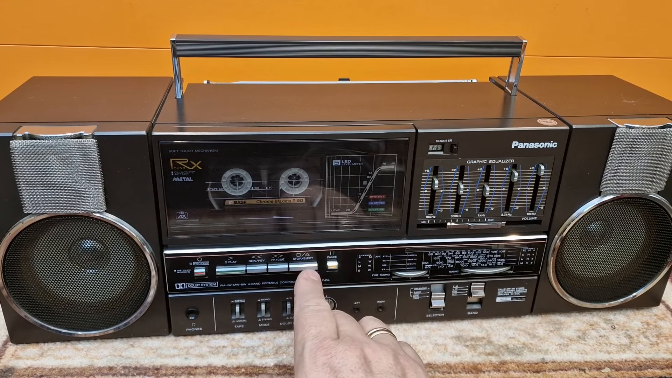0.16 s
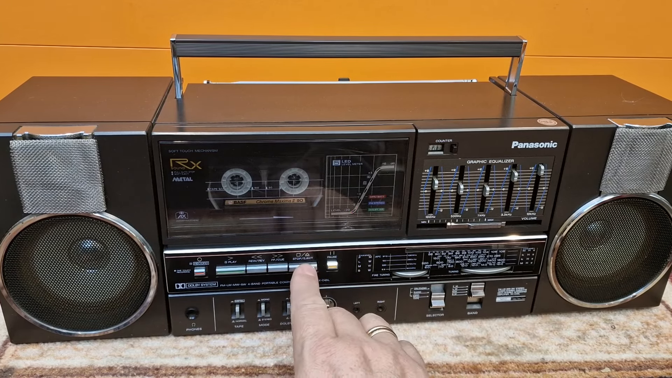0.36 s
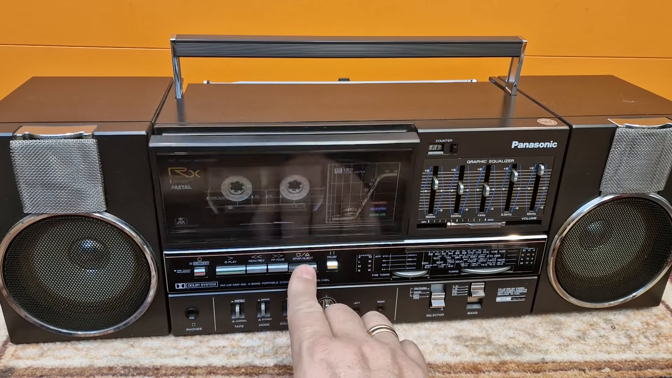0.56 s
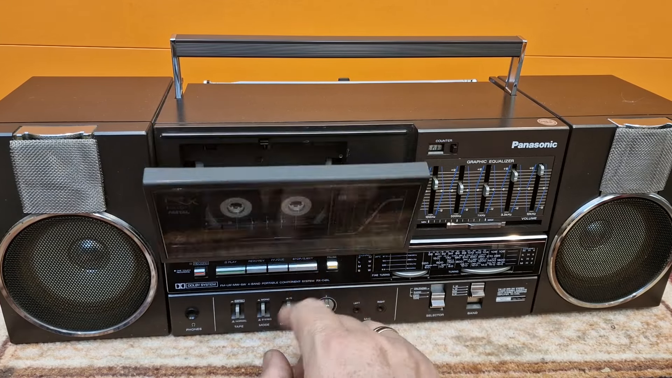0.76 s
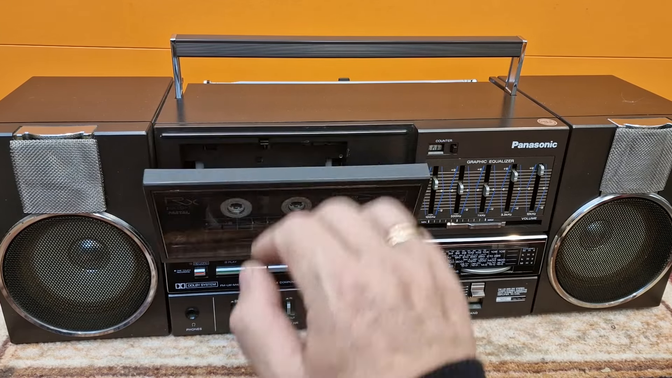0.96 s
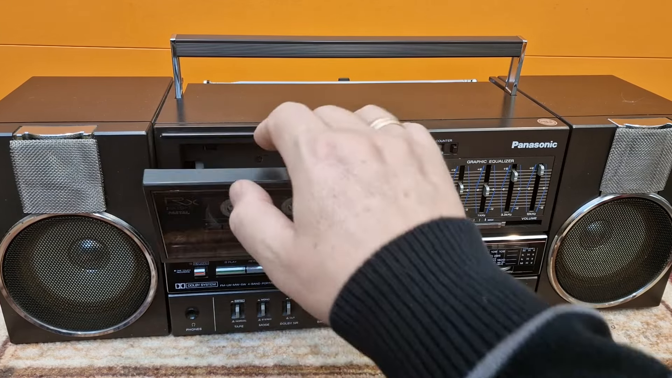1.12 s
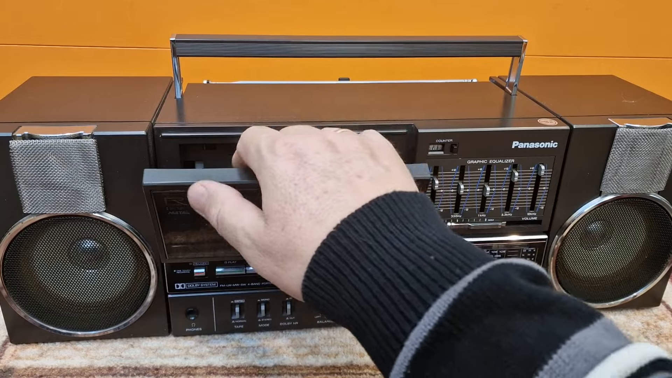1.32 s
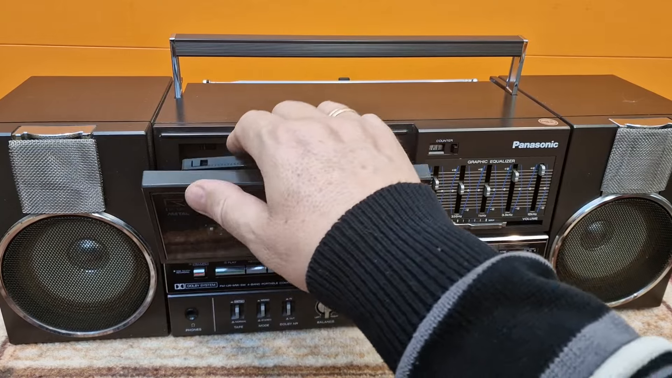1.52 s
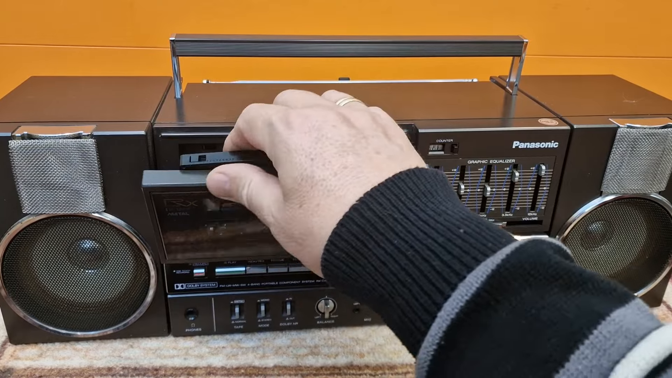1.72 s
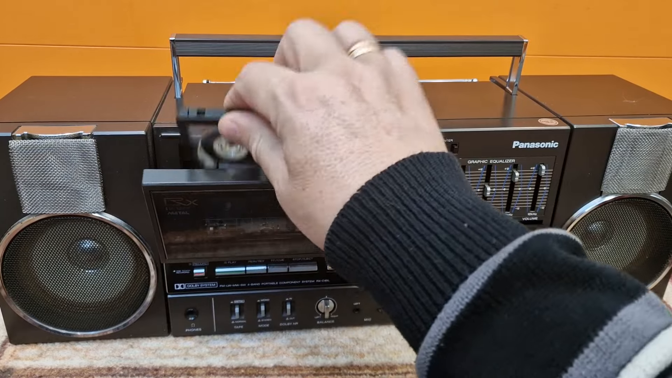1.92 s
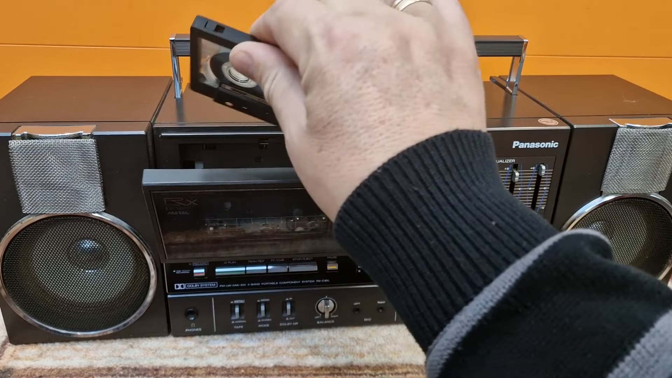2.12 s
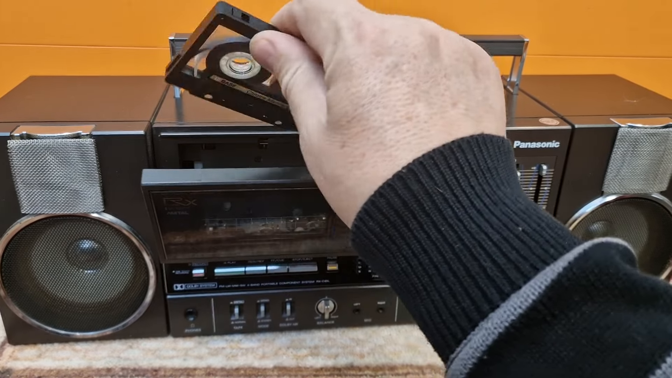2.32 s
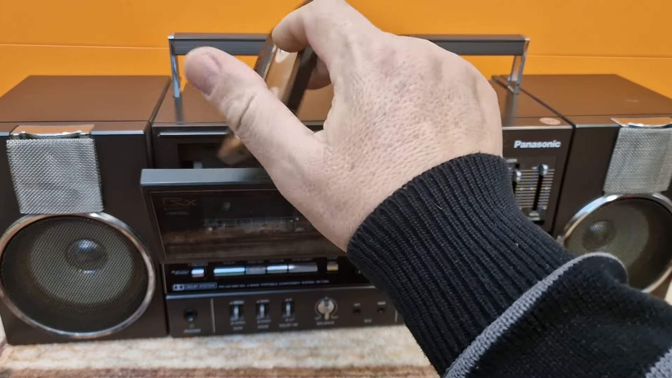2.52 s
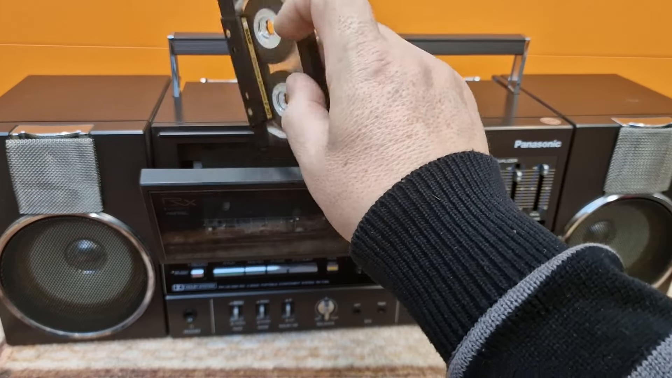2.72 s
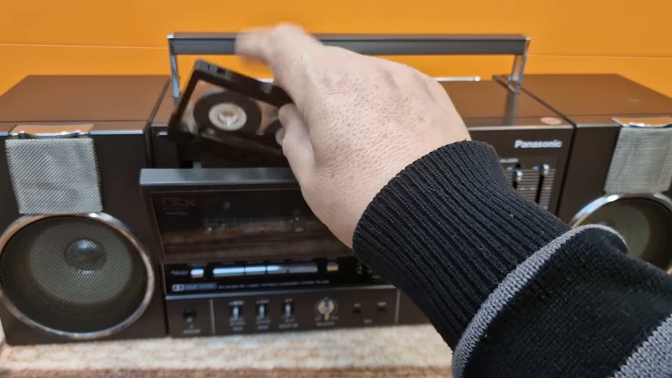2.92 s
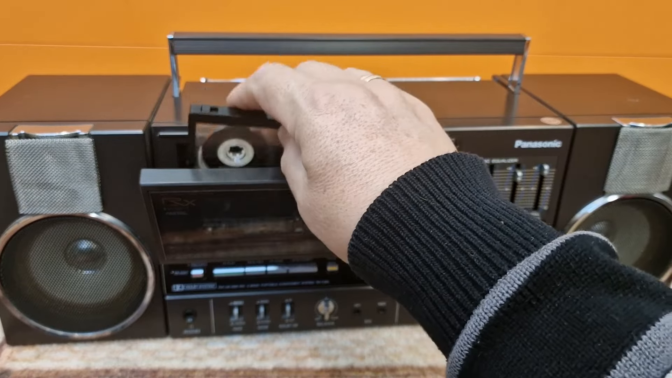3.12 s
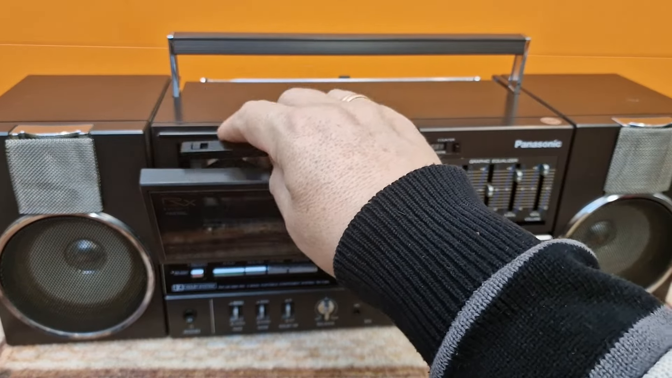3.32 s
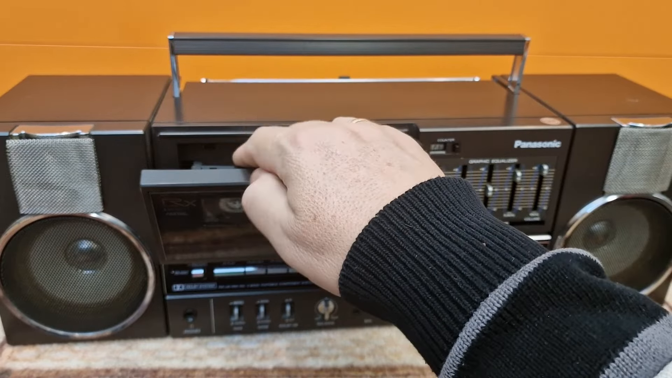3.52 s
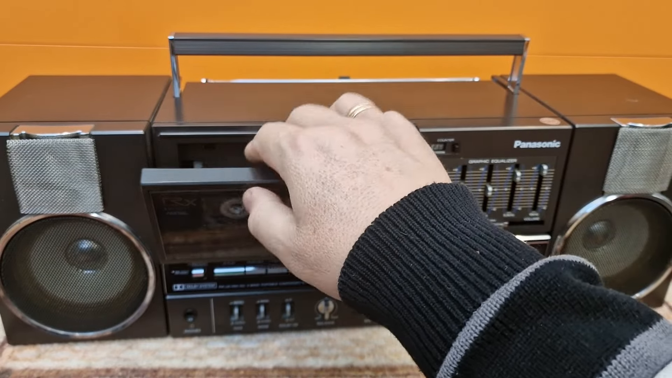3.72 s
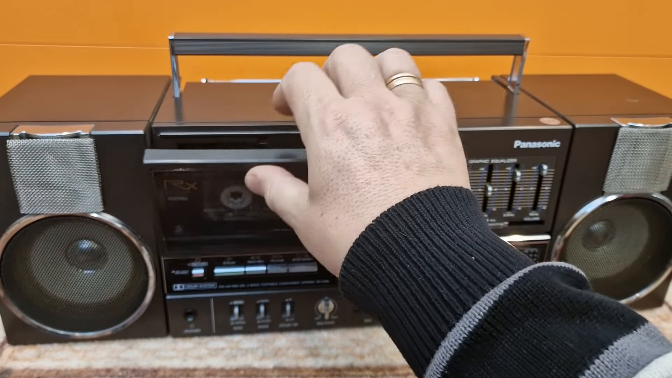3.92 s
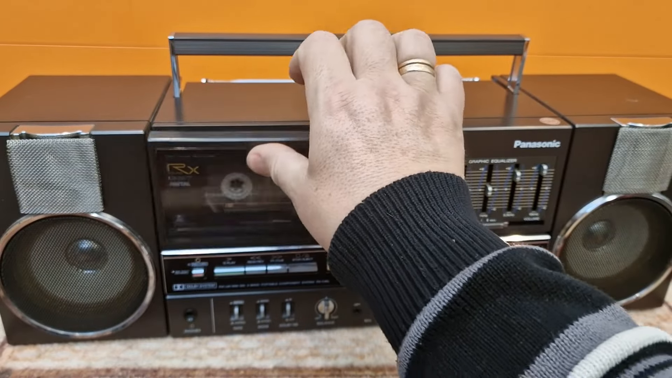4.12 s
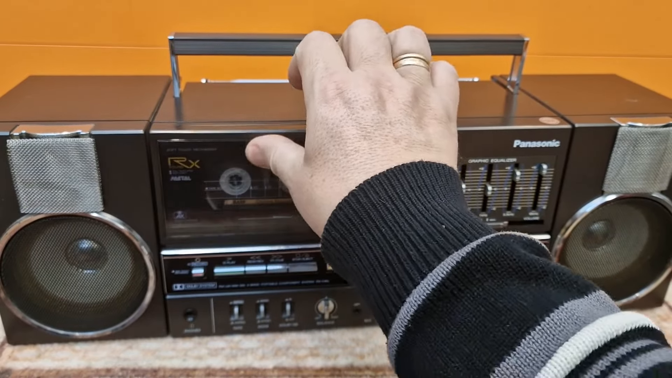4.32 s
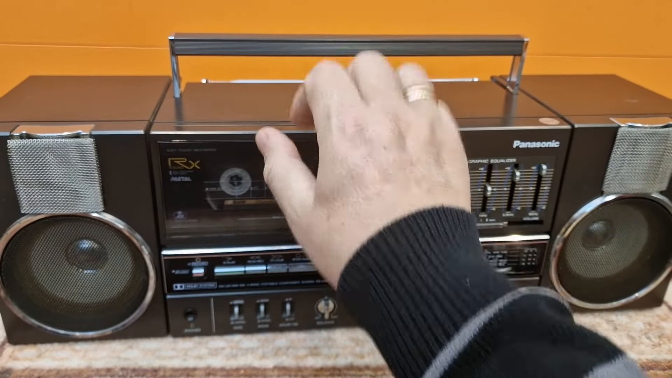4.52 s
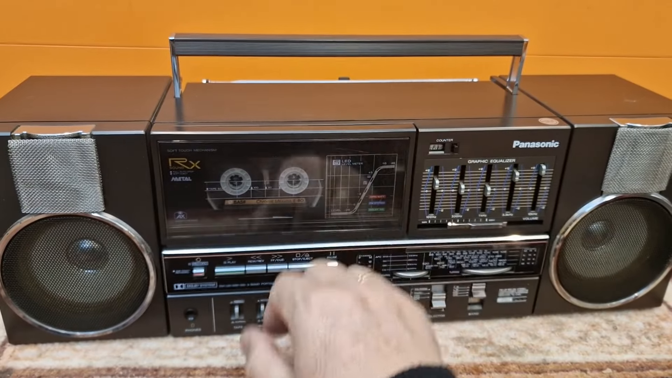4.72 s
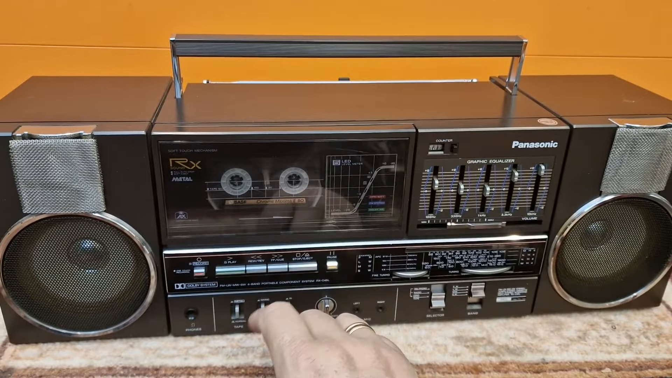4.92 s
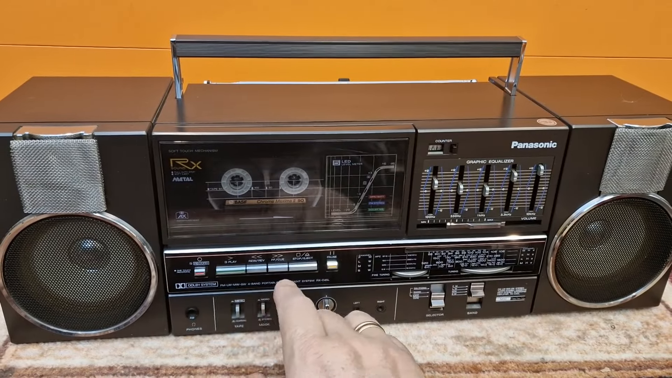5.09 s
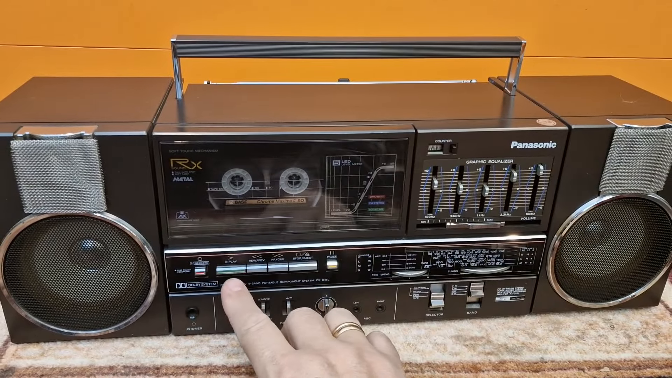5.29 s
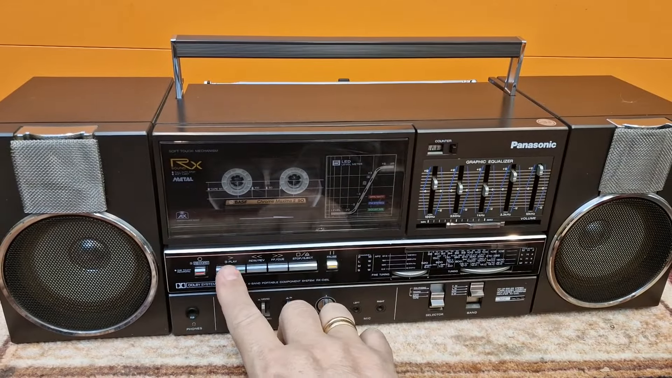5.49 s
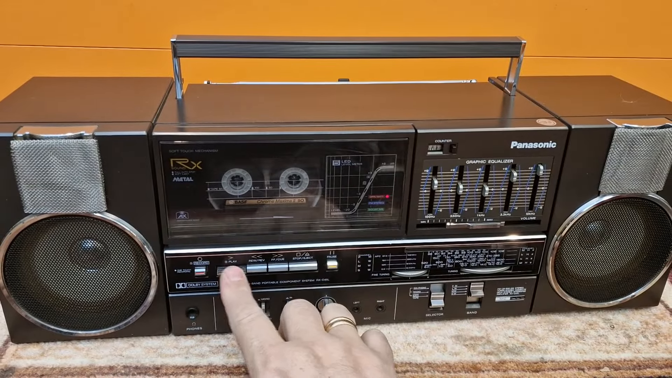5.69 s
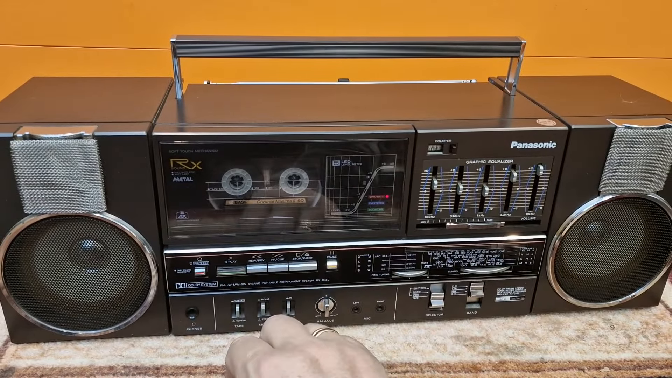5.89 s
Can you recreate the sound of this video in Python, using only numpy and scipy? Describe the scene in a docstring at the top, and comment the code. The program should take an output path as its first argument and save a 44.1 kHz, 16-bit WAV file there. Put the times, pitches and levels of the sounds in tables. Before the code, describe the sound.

Close stereo sound of a cassette deck handled indoors, slightly left, with a short small-room tail, low rumble and faint hiss. A quiet gear-like whirr runs at first. At about 0.57 s a key gives a hard double clack with a hollow cabinet knock; the door opens with softer knocks until 0.85 s, and the whirr fades out after 1 s. From 1.4 to 2.25 s the cassette clicks, scrapes and rattles out, loudest near 2.1 s. Sparse, light bright ticks follow at 2.5-2.9 s as it is turned. A brief squeak at 3.05 s leads into knocks and sliding, with strong clunks at 3.16, 3.45 and 3.6 s as it seats. The door shuts in a sharp double snap near 4.3 s, with a small click at 4.45 s. A deep, dull thump comes at 4.86 s amid faint hum. A modest key click lands at 5.67 s, trailed by small ticks.

```python
"""A portable tape deck on a carpet, worked by hand close by: stop key, door, cassette out, turned and back in,
door shut, play key. Noise bursts ring the cassette shell as hard plastic ticks, half-sine pushes ring the
hollow cabinet as knocks, friction noise makes the slides and a squeak, and one dull thump shakes the floor.
The tape drive whirrs at first as resonant noise; a hum surrounds the thump, over low rumble and faint hiss.
A small room answers the handling as decaying noise tails."""
import sys
import numpy as np
from scipy import signal
from scipy.fft import rfft, irfft, next_fast_len
from scipy.io import wavfile

SR = 44100
rng = np.random.default_rng(int(sys.argv[2]) if len(sys.argv) > 2 else 0)


def bounce(signal):
    """Save signal as a 16-bit WAV file at the path given by the first command-line argument."""
    frames = np.transpose(np.atleast_2d(signal))
    limited = np.clip(frames, -1, 1)
    pcm = np.round(limited * 32767).astype(np.int16)
    wavfile.write(sys.argv[1], SR, pcm)


N = 262395

# resonances of the cassette shell: centre_hz, width_hz, relative_db
SHELL = [(860, 750, -8), (1100, 840, -3), (1272, 174, 4.5), (1513, 315, 3), (1745, 248, 6), (2290, 750, -2),
         (2530, 284, -2)]
# treble resonances of hard plastic in contact: centre_hz, width_hz, relative_db
CRACK = [(3036, 740, 7), (3783, 1420, 4.5), (4960, 1160, 3), (5980, 680, 0), (7170, 1090, 1.5),
         (9460, 17000, -20), (11000, 4000, -17.5), (12820, 1900, -10.5), (14400, 1700, -11)]
# resonances of the cabinet panels: centre_hz, width_hz, relative_db
PANELS = [(296.8, 24.4, 0.5), (353.9, 12, 2.5), (415, 62, -6), (501, 46, -3), (630, 72, -6), (845, 20, -13)]
# resonances of the air in the cabinet: centre_hz, width_hz, relative_db
CABINET_AIR = [(120.3, 12, 0.5), (163.1, 11.3, 8.5)]
# drive of the cabinet's murmur under the working hand: time_s, panels_db, air_db
MURMUR_LEVELS = [(0.0, -67.5, -74.5), (0.4, -63.5, -72), (0.86, -58.5, -54), (1.14, -69, -74),
                 (1.62, -70.5, -62), (1.95, -61, -63), (2.3, -84, -83), (3.05, -77.5, -78.5),
                 (3.2, -64, -64.5), (3.66, -49.5, -52), (4.04, -80.5, -77), (4.39, -57, -59),
                 (4.59, -79.5, -69), (4.94, -78, -62.5), (5.39, -82, -75), (5.72, -60.5, -58),
                 (5.95, -68.5, -56)]


def amp(db):
    """A level in decibels is a logarithmic ratio: returns the linear amplitude gain."""
    return 10 ** (np.asarray(db) / 20)


def pan(left_over_right_db):
    """Intensity stereo: the level difference is shared equally between the two ports."""
    return amp(left_over_right_db * np.array([[0.5], [-0.5]]))


def unit(x):
    """Power normalization: scales a signal to rms 1."""
    return x / np.sqrt(np.mean(x ** 2) + 1e-20)


def along(points, hz):
    """Logarithmic frequency scale: interpolates (frequency, value) points along it."""
    point_hz, value = np.transpose(points)
    return np.interp(np.log(hz + 1), np.log(point_hz + 1), value)


def curves(rows, outside=None):
    """Piecewise-linear envelopes: one value per sample for each column after the time."""
    time_s, *columns = np.transpose(rows)
    return [np.interp(np.arange(N) / SR, time_s, column, outside, outside) for column in columns]


def held(start_s, stop_s, level_db, edge_s, fade_db):
    """Sustained-tone envelope: an onset, a drift by -fade_db while held, and a release."""
    points = [(start_s, level_db - 19), (start_s + edge_s, level_db),
              (stop_s - edge_s, level_db - fade_db), (stop_s, level_db - 25.5)]
    return amp(curves(points, outside=-120)[0])


def filtered(x, gain):
    """Convolution theorem: multiplies the spectrum by a gain that depends on frequency."""
    size = next_fast_len(N + SR // 2)
    hz = np.fft.rfftfreq(size, 1 / SR)
    return irfft(rfft(x, size) * gain(hz), size)[..., :N]


def response(modes, f):
    """Modal superposition: second-order resonances of alternating sign; white noise keeps its rms."""
    ring = 0
    for k, (centre, width, db) in enumerate(modes):
        resonance = 1j * f * width / (centre * centre - f * f + 1j * f * width)
        ring = ring + (-1) ** k * amp(db) * resonance
    return ring / np.sqrt(np.mean(abs(ring) ** 2))


def body(x, modes):
    """Forced vibration: the excitation x rings a set of resonances."""
    return filtered(x, lambda f: response(modes, f))


def pair(size, alike):
    """Interchannel coherence: two noises whose correlation is alike."""
    common, opposite = rng.standard_normal((2, size))
    turn = np.arccos(np.clip(alike, 0, 1)) / 2
    return np.cos(turn) * common + np.sin(turn) * opposite * [[1], [-1]]


def gritty(spread_db, count):
    """Stick and slip of a rubbing contact: a random gain of rms 1 that holds for count samples."""
    step_db = spread_db * rng.standard_normal(N // count + 1)
    return unit(np.repeat(amp(step_db), count)[:N])


def tilt(s, f):
    """Spectral tilt about 6 kHz: the treble gain at time s, flat below 2.5 kHz."""
    # dull with the cassette in its well, bright out in the open and on the keys: time_s, tilt_db_per_octave
    openness = [(0.62, 1.5), (0.75, -4), (1.3, -4.5), (2.04, -2.5), (2.08, 3), (2.9, 4), (3.12, -1.5),
                (3.65, -0.5), (3.8, -15.5), (4.28, 0.5), (4.45, -8), (5.6, -6), (5.67, 2.5), (5.9, -5)]
    octaves = np.log2(np.clip(f, 2500, None) / 6000)
    return amp(np.interp(s, *np.transpose(openness)) * octaves)


def drive():
    """Resonant radiation: broad noise of gears and tape with narrow housing resonances, running down."""
    # resonances of the drive housing: centre_hz, width_hz, relative_db
    housing = [(410, 50, 5), (1610, 56, -4), (2288, 92, -0.5), (3650, 150, -8.5), (5360, 180, -12),
               (6600, 170, -11.5), (8070, 75, -5.5), (8470, 160, -35), (11200, 150, -16.5)]
    # spectral density of the broad noise: frequency_hz, relative_db_per_hz
    bed_spectrum = [(88, -10), (150, -15.5), (439, -11.5), (1870, -18), (2310, -15), (2870, -20),
                    (8070, -20), (16000, -32)]
    start_db, sag_db_per_s = -56.5, 7.5
    stop_s, run_down_db_per_s = 1, 35.5  # added to the sag after stop_s
    bed = unit(filtered(pair(N, 0.059), lambda hz: amp(along(bed_spectrum, hz))))
    whirr = bed + amp(1.0) * body(pair(N, 0.25), housing)
    t = np.arange(N) / SR
    level_db = start_db - sag_db_per_s * t - run_down_db_per_s * np.maximum(t - stop_s, 0)
    return amp(level_db) * whirr * pan(7)


def hiss():
    """Partly coherent noise field: room tone and microphone noise, most alike left and right in the bass."""
    # spectral density: frequency_hz, relative_db_per_hz
    spectrum = [(15, -33), (25, -8.5), (149, -6), (249, -16.5), (624, -27), (714, -26.5), (818, -19.5),
                (911, -27), (1230, -21), (1790, -23), (2480, -24.5), (5880, -30.5), (7510, -26.5),
                (9570, -45.5), (16000, -55.5)]
    # left-right correlation: frequency_hz, correlation
    likeness = [(60, 0.7), (240, 0.26), (950, 0.05), (3770, 0.073), (15000, 0.13)]

    def mid_side_gain(hz):
        turn = np.arccos(np.clip(along(likeness, hz), -1, 1)) / 2
        return amp(along(spectrum, hz)) * [np.cos(turn), np.sin(turn)]

    mid, side = filtered(rng.standard_normal((2, N)), mid_side_gain)
    return amp(-73) * unit(np.array([mid + side, mid - side]))


def murmur():
    """Forced vibration: the working hand feeds gritty noise to the panels and the air of the cabinet."""
    panels_db, air_db = curves(MURMUR_LEVELS)
    noise = gritty(spread_db=3.5, count=300) * rng.standard_normal((2, N))
    panels = body(amp(panels_db) * noise[0], PANELS)
    air = body(amp(air_db) * noise[1], CABINET_AIR)
    return (panels + air) * pan(1.6)


def rumble():
    """Narrow-band noise: one low resonance, with a steady part and a part that follows the murmur."""
    steady_db, below_murmur_db = -81, -18.5
    level = amp(steady_db) + amp(curves(MURMUR_LEVELS)[0] + below_murmur_db)
    return level * body(pair(N, 1.0), [(55, 17, 0)])


def slide():
    """Friction excitation: grit rings the shell and treble modes, and swells with the stroke's speed."""
    # plastic on plastic: start_s, fastest_s, stop_s, fastest_db, fizz_db (before the tilt, over the shell)
    strokes = [(0.537, 0.62, 0.97, -60, -3), (1.38, 1.57, 1.65, -56, -3), (1.787, 2.106, 2.34, -50.5, -5),
               (2.386, 2.495, 2.6, -69, 6), (2.62, 2.86, 2.99, -72.5, 6),
               (3.355, 3.622, 3.92, -50.5, -14.5), (4.135, 4.368, 4.51, -59.5, -5.5),
               (5.548, 5.75, 6.1, -61, -4)]
    start_below_db, stop_below_db = -20, -22  # relative to the fastest moment
    rub, fizz = np.zeros(N), np.zeros((2, N))
    grit = gritty(spread_db=1, count=120) * pan(3)
    for start, fastest, stop, db, fizz_db in strokes:
        swell = [(start, db + start_below_db), (fastest, db), (stop, db + stop_below_db)]
        level = amp(curves(swell, outside=-120)[0])
        rub += level
        treble = filtered(grit * pair(N, 0.86), lambda f: response(CRACK, f) * tilt(fastest, f))
        fizz += amp(fizz_db) * level * treble
    return body(rub * grit * pair(N, 0.71), SHELL) + fizz


def ticks():
    """Impact excitation: each contact scuffs in and rattles briefly, ringing shell and treble modes."""
    # hard plastic contacts: time_s, shell_db, crack_db (relative to the shell), rattle_s
    contacts = [(0.568, -25.5, -7.5, 0.0078), (0.5773, -23, -2, 0.0037), (0.615, -33.5, -5, 0.0049),
                (0.7485, -42, 2, 0.011), (0.853, -46, -6, 0.0048), (1.182, -62, 2.5, 0.014),
                (1.4006, -30, -3.5, 0.0024), (1.4565, -32, -12, .0068), (1.511, -31, -13.5, 0.0047),
                (1.573, -38, -9, 0.0067), (1.592, -37.5, -8.5, .0036), (1.7, -45, -33, 0.0033),
                (1.799, -57, -30, 0.0043), (1.849, -40.5, -4.5, 0.006), (1.905, -46.5, -11, 0.0038),
                (1.946, -42.5, -10, 0.008), (1.9625, -41.5, -3, 0.016), (1.99, -33.5, -4.5, 0.0069),
                (2.044, -37, -17.5, 0.0073), (2.068, -35, -6, 0.0052), (2.0825, -25.5, -7, 0.0041),
                (2.169, -25, -12.5, 0.0018), (2.1935, -28.5, -8.5, 0.0043), (2.2324, -41, 5, 0.001),
                (2.483, -56.5, 5, 0.0035), (2.5136, -54, 7, 0.0047), (2.6267, -35, -5, 0.0084),
                (2.661, -48, 2, 0.0071), (2.739, -61, 15.5, 0.0061), (2.8025, -54, 8, .0038),
                (2.8316, -48, 1, 0.0048), (2.8656, -57.5, 16.5, 0.0059), (2.906, -65, 18.5, 0.0056),
                (3.01, -42, -11.5, 0.012), (3.117, -39.5, -8, 0.0062), (3.1585, -25.5, -5.5, 0.0059),
                (3.1925, -32, -7, 0.0074), (3.276, -37.5, -2.5, 0.0041), (3.3933, -41.5, -14.5, 0.0015),
                (3.4488, -23.5, -7, 0.006), (3.5987, -40.5, -11, 0.0092), (3.6132, -28.5, -6, .0078),
                (3.6374, -24, -1.5, 0.003), (3.795, -46.5, -9, 0.0079), (4.144, -57, -24, 0.0068),
                (4.1987, -48, -4.5, 0.018), (4.215, -60, 10, .002), (4.2307, -44.5, 0.5, 0.003),
                (4.251, -41, -11, 0.0053), (4.282, -24.5, -4, 0.0054), (4.309, -26, 2, 0.0065),
                (4.452, -46, -4, 0.0046), (4.882, -61, -6, .009), (5.569, -64, 2, 0.01),
                (5.618, -61, -2, 0.0065), (5.6441, -46.5, 3, 0.013), (5.6662, -33.5, 3.5, 0.007),
                (5.758, -48, -0.5, 0.0082), (5.8467, -51, -1, 0.005)]
    out = np.zeros((2, N + SR))
    t = np.arange(-600, 3496) / SR  # starts ahead of the contact, to hold the scuff
    f = np.fft.rfftfreq(len(t), 1 / SR)
    after = np.maximum(t, 0)
    scuff = amp(-14.5) * np.exp(-abs(t) / 0.0052)
    for s, db, crack_db, length in contacts:
        pan_db = rng.normal(2.5, 1.5)  # left over right, scattered from contact to contact
        rattle = np.exp(-(after / length) ** 2) * (1 - np.exp(-after / 0.0005))
        shape = scuff + rattle
        # no two blows land alike
        struck = [(centre, width, level + rng.normal(0, 2.66)) for centre, width, level in SHELL]
        shell = rfft(shape * pair(len(t), 0.6)) * response(struck, f)
        shell = shell / (1 + 1j * f / 3500) ** 2  # two first-order low-passes
        crack = rfft(shape * pair(len(t), 0.8)) * response(CRACK, f) * tilt(s, f)
        # the blow's strength sets the energy, whatever the rattle's pattern
        energy = np.linalg.norm(shape)
        both = energy * (shell / np.std(shell) + amp(crack_db) * crack / np.std(crack))
        # each contact point has its own path to the ports, up to 3 samples apart
        both[1] *= np.exp(-2j * np.pi * f * rng.uniform(-3, 3) / SR)
        first = round((s + t[0]) * SR)
        out[:, first:first + len(t)] += amp(db) * pan(pan_db) * irfft(both)
    return out[:, :N]


def knocks():
    """Impulse response: a half-sine push pops and rings the cabinet; a longer one feeds only the lowest modes."""
    # blows that reach the cabinet: time_s, push_db, contact_s, pop_db (relative to the push)
    # the pop is high where the hand damps the panels
    blows = [(0.571, -1, 0.00057, -6.5), (0.581, -10.5, 0.00062, -17), (0.752, -16.5, 0.0011, -15),
             (0.854, -12.5, 0.0021, -11), (1.387, -13.5, 0.0016, -22), (1.455, -13.5, 0.00047, -17),
             (1.515, -14, 0.00039, -18), (1.59, -19.5, 0.00031, 0), (1.699, -21, 0.0014, -2),
             (1.848, -16.5, 0.0021, -4), (1.883, -14.5, 0.0016, -18), (1.947, -16.5, 0.0015, -18),
             (1.995, -11.5, 0.0011, -6), (2.626, -31.5, 0.0002, -18), (3.045, -17.5, 0.0015, 6),
             (3.117, -8.5, 0.0012, -3.5), (3.187, -5, .0015, -16), (3.274, -14.5, 0.0017, -8.5),
             (3.449, -10, 0.0015, -3.5), (3.613, 0, 0.001, -24), (3.637, 0.5, 0.001, -16),
             (3.819, -22, 0.00077, -2), (4.097, -28, 0.0025, -8), (4.143, -32, 0.00086, -10),
             (4.201, -10, 0.0019, -15), (4.229, -12, 0.0015, -10), (4.257, -17, 0.001, -11),
             (4.282, -0.5, 0.00052, -17.5), (4.307, -.5, 0.00091, -18.5), (4.455, -9.5, 0.0016, -13),
             (5.64, -21.5, 0.001, -16), (5.668, -9.5, 0.00062, -14.5), (5.757, -20, .0012, -3),
             (5.84, -23, 0.0016, -6)]
    push = np.zeros((2, N + SR))
    for s, db, contact, pop_db in blows:
        blow = np.sin(np.pi * np.arange(0, 1, 1 / (contact * SR)))
        first = round(s * SR) + 60  # 1.4 ms after the listed time
        push[:, first:first + len(blow)] += amp([[db], [db + pop_db]]) * blow / blow.sum()
    ring, pop = push[:, :N]
    panels = body(ring, PANELS)
    air = body(amp(-13.5) * ring, CABINET_AIR)
    return (panels + air + body(pop, [(250, 480, 0)])) * pan(1.6)


def squeak():
    """Frictional resonance: the cassette edge rubs its guides, heard only in their narrow resonances."""
    # resonances of the guides: centre_hz, width_hz, relative_db
    guide_modes = [(1432, 70, -5.5), (2247, 28, -1), (3100, 110, 5.5), (5600, 33, -1.5)]
    level = held(start_s=3.04, stop_s=3.125, level_db=-54.5, edge_s=0.012, fade_db=-0.5)
    return level * body(pair(N, 0.99), guide_modes)


def hum():
    """Narrow-band noise: two slightly wavering low tones, faint around the thump."""
    level = held(start_s=4.66, stop_s=5.15, level_db=-57.5, edge_s=0.074, fade_db=9.5)
    return level * body(rng.standard_normal(N), [(120.4, 11.0, -2.5), (410, 8.7, -12.5)])


def thumps():
    """Free decay: the floor and carpet ring as a sum of a few damped low modes."""
    # low thumps through the carpet: time_s, level_db (scales all the modes)
    falls = [(4.858, -21)]
    # modes of floor and carpet: frequency_hz, relative_db, t60_s
    ground = [(39.7, -20, 0.89), (60.1, -16, 0.46), (69.2, 3, 0.34), (76.6, -15, 0.53), (114.9, -7, 0.33),
              (168.8, -6.5, 0.21)]
    out, t = np.zeros(N + SR), np.arange(SR) / SR
    onset = 1 - np.exp(-t / 0.011)
    for s, db in falls:
        ring = sum(amp(level - 60 * t / t60) * np.sin(2 * np.pi * hz * t) for hz, level, t60 in ground)
        first = round(s * SR)
        out[first:first + SR] += amp(db) * ring * onset
    return out[:N] * pan(1)


def room(x, count=20):
    """Reverberant decay: noise tails die away at each frequency's own rate."""
    # reverberation time: frequency_hz, t60_s
    decay = [(150, 0.34), (500, 0.3), (2000, 0.23), (6000, 0.26), (14000, 0.24)]
    out, size = np.zeros((2, N + SR)), N // count + 1
    for k in range(count):  # each of count equal stretches of time gets a fresh random tail
        hz, t, z = signal.stft(rng.standard_normal((2, SR // 2)), SR, nperseg=256)
        alike = np.clip(1 - hz / 900, 0, 1)[:, None]  # long waves reach both ports alike
        z[1] = alike * z[0] + np.sqrt(1 - alike ** 2) * z[1]
        fall = amp(-60 * (t / along(decay, hz)[:, None]) ** 1.006)
        build_up = 1 - np.exp(-t / 0.0015)
        tail = signal.istft(z * fall * build_up, SR, nperseg=256)[1]
        stretch = x[:, k * size:(k + 1) * size]
        wet = signal.fftconvolve(stretch, tail / np.linalg.norm(tail[0]), axes=1)
        first = k * size + 150  # the room answers 3.4 ms late
        out[:, first:first + wet.shape[1]] += wet
    return out[:, :N]


def scene():
    """Superposition with a time difference: the deck stands a little left, so its treble reaches that port first."""
    bright = ticks() + slide() + squeak()
    bright[1] = np.roll(bright[1], 7)  # samples, 0.16 ms
    blows = knocks() + murmur()
    wet = room(amp(-4.5) * bright + amp(-2.5) * blows)
    return bright + blows + wet + rumble() + thumps() + hum() + drive() + hiss()


def record(dry):
    """Band limitation: the highest treble falls by 25 dB from 15.84 to 16.24 kHz, silent from 16.8 kHz."""
    return filtered(dry, lambda hz: amp(-25 * np.clip((hz - 15840) / 400, 0, 1)) * (hz < 16800))


dry = scene()
out = record(dry)
bounce(out)
```